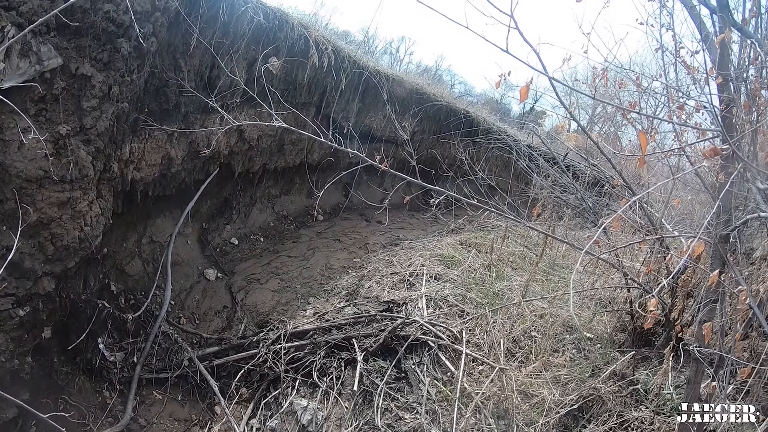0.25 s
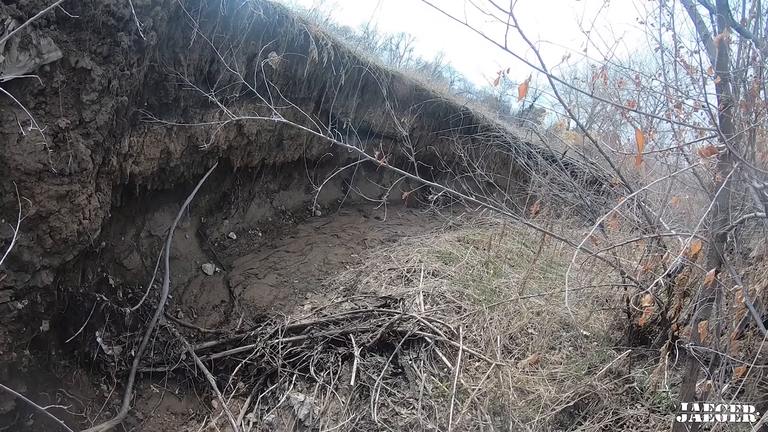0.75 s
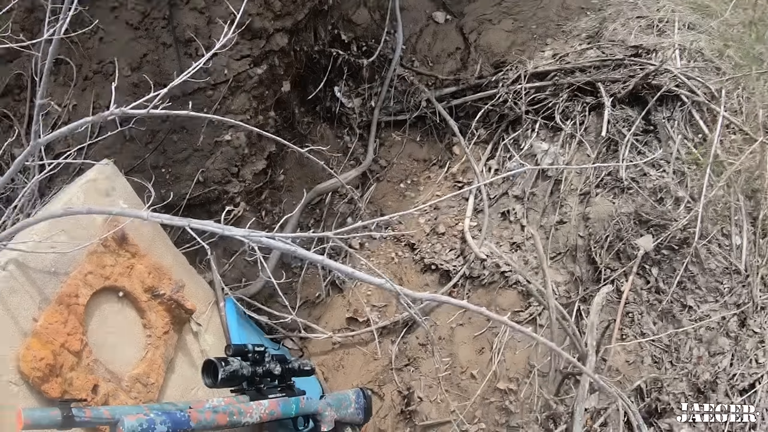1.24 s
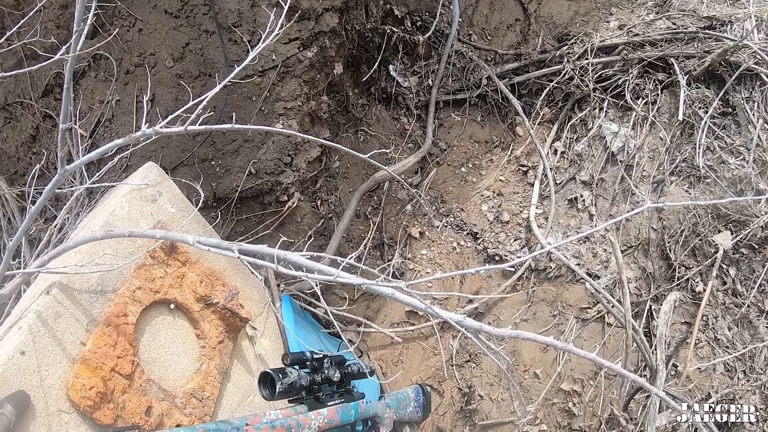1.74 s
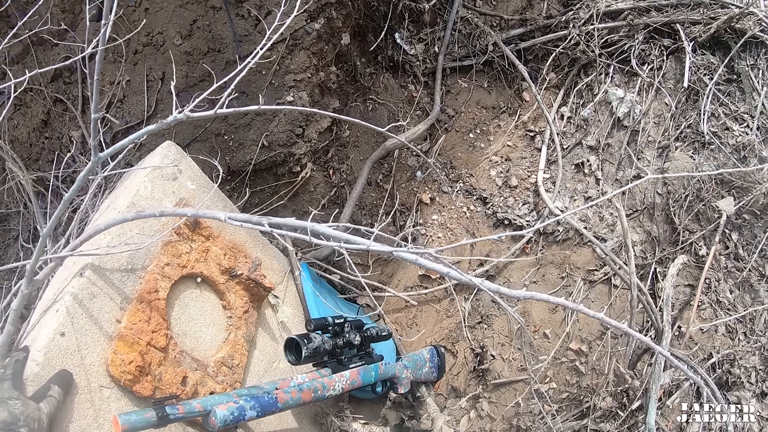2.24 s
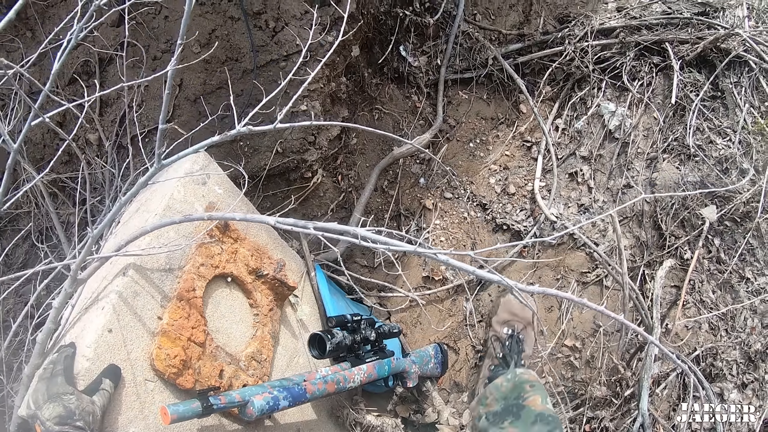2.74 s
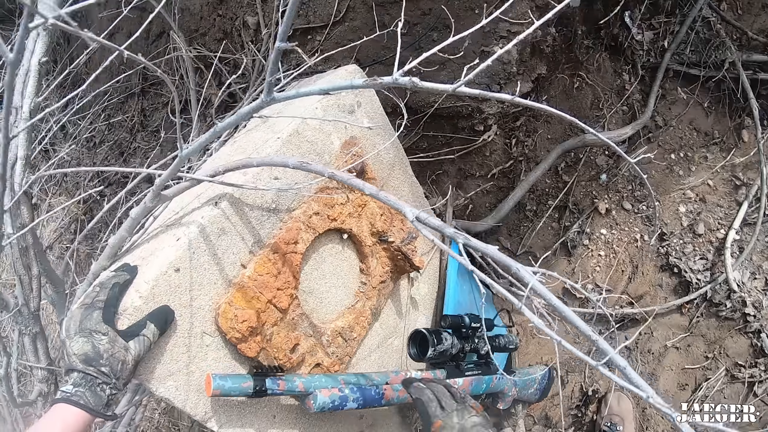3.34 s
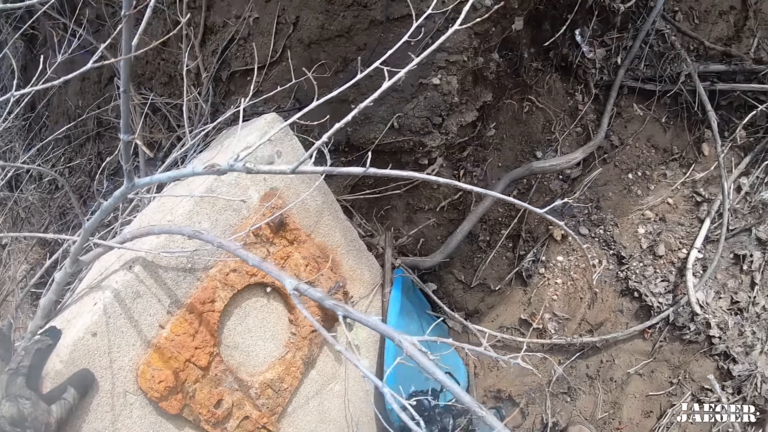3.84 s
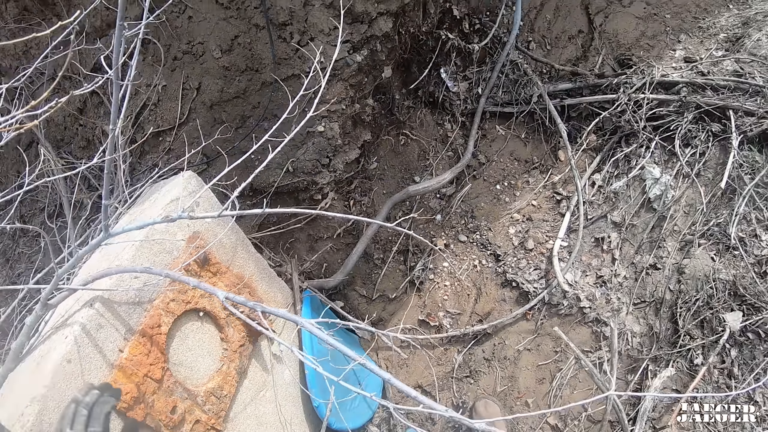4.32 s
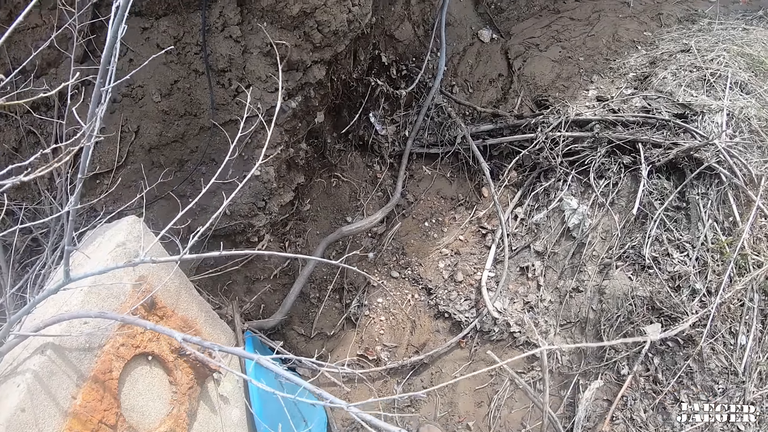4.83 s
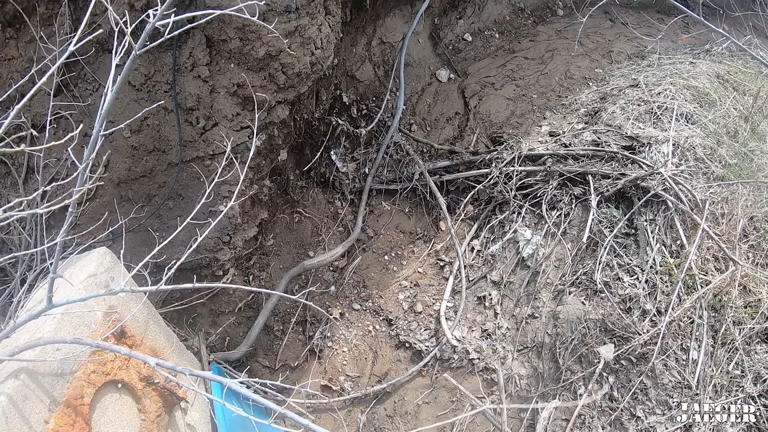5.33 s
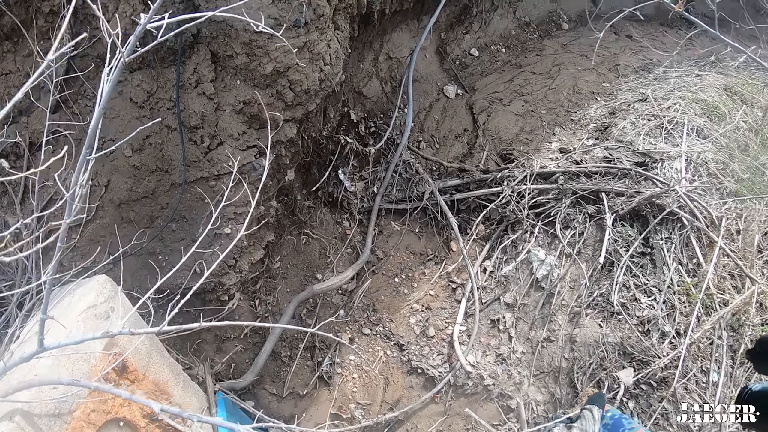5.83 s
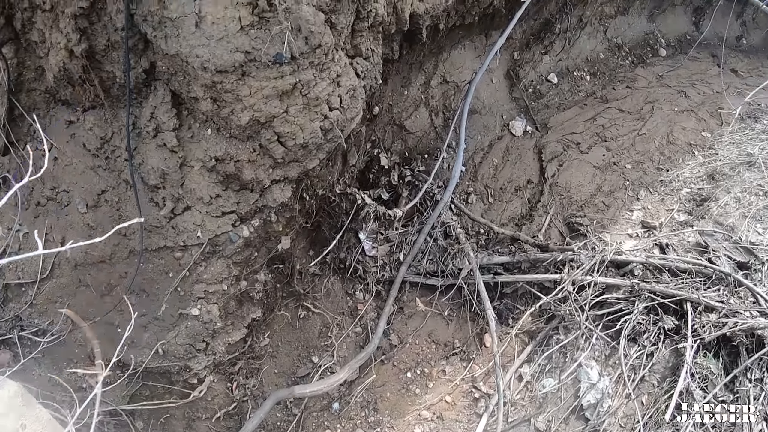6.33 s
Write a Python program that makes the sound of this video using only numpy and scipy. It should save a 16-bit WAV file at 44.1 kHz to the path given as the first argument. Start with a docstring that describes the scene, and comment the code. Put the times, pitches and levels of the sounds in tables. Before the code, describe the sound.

After a brief rustle and a near-quiet pause, dry branches scrape and crackle close up, with one very loud twig snap and muffled bumps on the housing.

```python
"""Dry brush, where someone shifts and steps with a small camera strapped to the body.
Leaves and branches rustle against cloth as trains of random slips; twigs snap and stalks crunch as
dying noise bursts. Rubbing, knocks and taps excite the low resonances of the housing, and the strap
thrums as a sine. Filtered noise gives the wind rumbling on the microphone port and the far leaves."""
import sys
import numpy as np
from scipy import signal
from scipy.fft import rfft, irfft
from scipy.io import wavfile

SR = 44100
rng = np.random.default_rng(int(sys.argv[2]) if len(sys.argv) > 2 else 0)


def log_audio(samples):
    """Write samples as a 16-bit WAV file to the path given in sys.argv[1]."""
    # one column per channel
    frames = np.atleast_2d(samples).T
    # limit to full scale, then quantise
    limited = np.clip(frames, -1, 1)
    pcm = np.round(limited * 32767).astype(np.int16)
    wavfile.write(sys.argv[1], SR, pcm)


N = 289737

# leaves and twigs dragged along, level by grain size: start_s, coarse_db, middle_db, fine_db
DRAG_LEVELS = [(0.0, -50.5, -54, -51.5), (0.1, -67.5, -66, -66.5), (0.45, -71.5, -64.5, -67.5),
               (0.56, -78.5, -66.5, -70.5), (0.87, -83, -79.5, -91), (1.5, -85, -83, -99),
               (1.63, -60, -57.5, -62), (1.75, -58.5, -56.5, -60.5), (2.0, -58.5, -66, -61.5),
               (2.17, -58, -53, -53), (2.27, -49, -48.5, -48), (2.4, -55, -53, -52),
               (2.49, -58, -61.5, -54), (2.68, -71, -65, -62.5), (2.8, -53.5, -64, -63),
               (2.93, -61, -62.5, -62.5), (3.07, -68, -63, -66), (3.18, -62, -59.5, -62),
               (3.28, -68, -63, -61.5), (3.36, -60.5, -57.5, -56), (3.6, -58.5, -57, -58),
               (3.72, -57.5, -54, -51), (3.9, -60, -59, -62), (4.23, -62, -61, -67.5),
               (4.495, -65, -63, -64), (4.508, -55, -54, -57), (4.528, -59, -56.5, -57),
               (4.545, -54, -52, -49.5), (4.72, -55, -51, -49.5), (4.88, -63.5, -60.5, -59.5),
               (5.15, -64, -62, -59.5), (5.25, -62, -63, -65), (5.45, -59, -57, -57),
               (5.63, -63.5, -64, -61.5), (5.76, -67, -66, -60), (5.88, -67, -61.5, -57.5),
               (6.1, -72, -64, -60), (6.3, -76, -63, -56.5), (6.57, -61, -59, -51)]
# airborne sound behind the small port: frequency_hz, density_db (per Hz)
PORT_FACING = [(590, -15.5), (1000, -15.5), (1360, -17.5), (1580, -15), (2140, -10.5), (2510, -1.5),
               (3050, -6.5), (3550, -7.5), (4200, -10), (5550, 2.5), (6250, -2), (6750, 0), (7320, -1.5),
               (8050, -1), (8750, -8.5), (9250, -14.5), (9800, -24), (10500, -19), (13000, -22.5),
               (15600, -21)]
# the same once the wearer has turned: frequency_hz, density_db (per Hz)
PORT_AWAY = [(590, -59), (1000, -20), (1130, -9), (1380, -21), (2090, -10.5), (2820, -4.5), (3200, -9),
             (4310, -3.5), (5300, 6), (6450, 7), (9100, -16.5), (12000, -23), (15600, -33)]
# how far the wearer has turned: start_s, share_turned (0-1)
TURNING = [(0, 0), (4.45, 0.04), (4.62, 0.24), (4.9, 0.1), (5.3, 0.66), (6.57, 0.74)]
# sharp part of a knock or tap: frequency_hz, density_db (per Hz)
RAP_SPECTRUM = [(200, 5), (600, -12.5), (850, -1.5), (1200, -18), (2000, -29.5)]


def from_db(db):
    """Amplitude ratio: 20 dB is a factor of ten."""
    return 10 ** (np.asarray(db) / 20)


def rms_one(x):
    """Normalisation to unit root-mean-square."""
    return x / np.sqrt(np.mean(x ** 2) + 1e-20)


def in_time(rows):
    """Linear interpolation of each curve column at every sample."""
    s, *columns = np.transpose(rows)
    return [np.interp(np.arange(N) / SR, s, c) for c in columns]


def drift(corner_hz):
    """Slow random modulation: noise through two equal one-pole low-passes; rms 1."""
    step = 20   # samples between drawn values
    r = np.exp(-2 * np.pi * step * corner_hz / SR)
    noise = rng.standard_normal(N // step + 2002)
    slow = signal.lfilter([1], [1, -2 * r, r * r], noise)[2000:]   # the run-in is dropped
    return np.interp(np.arange(N) / step, np.arange(len(slow)), rms_one(slow))


def colour(x, spectrum, size=8192):
    """Causality: a minimum-phase filter with this spectrum, so nothing sounds before its cause."""
    hz, db = np.transpose(spectrum)
    grid = np.log(np.maximum(np.fft.rfftfreq(size, 1 / SR), 1))
    cepstrum = irfft(np.log(from_db(np.interp(grid, np.log(hz), db))))
    # folding the cepstrum onto positive times makes the phase minimal
    cepstrum[1:size // 2] *= 2
    cepstrum[size // 2 + 1:] = 0
    return signal.fftconvolve(x, irfft(np.exp(rfft(cepstrum))))[:len(x)]


def resonance(x, hz, width_hz):
    """Damped oscillator: a two-pole band-pass with gain 1 on top."""
    r = np.exp(-np.pi * width_hz / SR)
    poles = [1, -2 * r * np.cos(2 * np.pi * hz / SR), r * r]
    return signal.lfilter([(1 - r * r) / 2, 0, (r * r - 1) / 2], poles, x)


def steep(x, hz, width_hz):
    """Two equal resonances in cascade, for steeper skirts; the width is that of each."""
    return resonance(resonance(x, hz, width_hz), hz, width_hz)


def grains(per_s, spread_db, clump_db, clump_hz):
    """Stick-slip as a random pulse train: slips of uneven size that come in clumps; rms 1."""
    sizes = from_db(spread_db * np.minimum(rng.exponential(1, N), 5))
    signs = rng.choice([-1, 1], N)
    slipping = rng.random(N) < per_s / SR
    return rms_one(sizes * signs * slipping * from_db(clump_db * drift(clump_hz)))


def stroke(s, hold_s, attack_s, release_s):
    """Envelope of friction: samples covered and power shape as a stroke rises, holds and dies."""
    span = slice(round(s * SR), min(round((s + hold_s) * SR) + SR // 3, N))
    since = np.arange(span.stop - span.start) / SR
    # time to fall 30 dB; longer strokes die more slowly
    fall_s = release_s + hold_s
    falling = np.maximum(since - attack_s - hold_s, 0) / fall_s
    return span, (np.clip(since / attack_s, 0, 1) * from_db(-30 * falling)) ** 2


def bursts(events, t60_s, longer, rise_s, width_share, top_hz, tail_db, tail_times,
           spectrum, turned_spectrum, break_db=13.5):
    """Impulsive excitation: a click in dying noise rings round a pitch, plus a broad crack.

    t60_s holds at a peak of -35 dB; longer is dB of ring time per dB of peak above that.
    break_db sets the click against the noise; the weaker tail lasts tail_times as long.
    """
    out, t = np.zeros(N + SR), np.arange(SR // 5) / SR
    dull = signal.butter(2, min(top_hz, 20000), fs=SR)
    turned = in_time(TURNING)[0]
    noises = rng.standard_normal((len(events), len(t)))
    for (s, peak_db, hz, broad_db), noise in zip(events, noises):
        at = round(s * SR)
        t60 = t60_s * from_db(longer * (peak_db + 35.0))
        dying = from_db(-60 * t / t60) + from_db(tail_db - 60 * t / (tail_times * t60))
        burst = noise * dying * (1 - np.exp(-(t / rise_s) ** 2))
        burst[round(rise_s * SR)] += from_db(break_db)
        crack = colour(burst, turned_spectrum if turned[at] > .5 else spectrum, size=2048)
        ring = steep(burst, hz, width_share * hz)
        burst = signal.lfilter(*dull, ring + from_db(broad_db) * crack)
        out[at:at + len(t)] += from_db(peak_db) * burst / np.abs(burst).max()
    return out[:N]


def brushing():
    """Addition of powers: levels in dB of coarse to finest grains from the drag plus swishes."""
    # the finest grains of the drag: start_s, level_db
    finest_drag = [(0.0, -59), (0.07, -69), (0.68, -99), (1.52, -106), (1.66, -69), (1.83, -68),
                   (2.12, -61), (2.38, -59), (2.49, -58), (2.63, -63.5), (3.04, -70.5), (3.22, -65.5),
                   (3.53, -60.5), (3.71, -57), (4.04, -72.5), (4.35, -74.5), (4.495, -70), (4.51, -59),
                   (4.66, -53.5), (5.05, -72), (5.18, -73), (5.42, -72), (5.6, -66), (6.29, -61.5),
                   (6.4, -57), (6.57, -54.5)]
    # short swishes of a branch over cloth: start_s, hold_s, coarse_and_middle_db, fine_db
    swish_strokes = [(0.0, 0.01, -82.5, -68), (0.233, 0.014, -64, -74), (0.445, 0.041, -62.5, -69),
                     (0.687, 0.021, -85, -72), (1.696, 0.03, -53.5, -61), (2.855, 0.014, -54.5, -55),
                     (2.945, 0.0045, -51, -56), (3.604, 0.016, -59, -64), (3.83, 0.054, -75, -58.5),
                     (4.366, 0.076, -71, -64), (5.045, 0.024, -62, -54.5), (5.104, 0.01, -75, -58),
                     (5.173, 0.0092, -57, -74), (5.419, 0.018, -69, -52.5), (5.811, 0.007, -61, -52.5),
                     (5.972, 0.057, -66, -56), (6.225, 0.012, -67, -60), (6.248, 0.023, -66, -55),
                     (6.488, 0.0098, -54, -73)]
    coarse_db, finest_db = -2.5, -3.5   # coarse against middle grains, finest against fine, in a swish
    power = from_db(in_time(DRAG_LEVELS) + in_time(finest_drag)) ** 2
    for s, hold_s, dull_db, fine_db in swish_strokes:
        span, shape = stroke(s, hold_s, attack_s=0.014, release_s=0.018)
        levels_db = [[dull_db + coarse_db], [dull_db], [fine_db], [fine_db + finest_db]]
        power[:, span] += from_db(levels_db) ** 2 * shape
    return 10 * np.log10(power)


def rustle():
    """Granular friction: thousands of leaf and bark slips a second, each ringing briefly at a pitch."""
    # limits of the coarse, middle, fine and finest bands: edge_hz
    band_edges = [500, 2000, 4000, 7300, 18000]
    slips = grains(9000, 0.27, 0.22, 58)
    clumps = from_db(1.43 * drift(36.8))
    slips = slips + from_db(-11.0) * grains(500, 2.8, 2.7, 8)   # sparse bigger ticks among them
    pitches = np.geomspace(900, 15000, 24)
    dealt = rng.integers(0, len(pitches), N)   # which pitch each slip rings at
    rings = 0
    for k, hz in enumerate(pitches):
        own_slips = slips * (dealt == k) * from_db(0.5 * drift(16.0))
        rings = rings + resonance(own_slips, hz, 0.28 * hz) / np.sqrt(hz)
    heard = np.array([colour(rings, PORT_FACING), colour(rings, PORT_AWAY)])
    turned = in_time(TURNING)[0]
    out = 0
    for level_db, low, high in zip(brushing(), band_edges, band_edges[1:]):
        band = signal.butter(3, [low, high], "band", fs=SR, output="sos")
        facing, away = signal.sosfilt(band, heard)
        out = out + from_db(level_db) * ((1 - turned) * rms_one(facing) + turned * rms_one(away))
    return clumps * out


def scrapes():
    """Resonant friction: uneven slips of bark on cloth ring round one pitch for a stroke."""
    # single branches scraping: start_s, hold_s, level_db, pitch_hz, width_hz
    scrape_strokes = [(1.617, 0.076, -56, 1090, 397), (1.687, 0.08, -51.5, 1090, 394),
                      (1.626, 0.065, -63.5, 3470, 700), (1.68, 0.34, -60.5, 2230, 900),
                      (2.18, 0.15, -51.5, 5300, 706), (2.235, 0.096, -60.5, 8160, 900),
                      (2.705, 0.16, -61, 1620, 695), (2.956, 0.13, -66.5, 1480, 696),
                      (3.632, 0.1, -56.5, 2430, 800), (3.635, 0.058, -57, 3930, 1000),
                      (4.528, 0.29, -70, 2590, 1210), (5.278, 0.2, -65, 2280, 600),
                      (5.49, 0.094, -67, 2230, 700), (5.623, 0.039, -74, 1730, 400),
                      (5.867, 0.26, -67, 1630, 450), (5.89, 0.14, -74, 2380, 400),
                      (1.87, 0.18, -62.5, 1570, 900), (2.754, 0.11, -62.5, 2320, 900)]
    out, slips = np.zeros(N), grains(4000, 0.8, 1.25, 40)
    for s, hold_s, db, hz, width_hz in scrape_strokes:
        span, shape = stroke(s, hold_s, attack_s=0.02, release_s=0.055)
        out[span] += from_db(db) * np.sqrt(shape) * rms_one(steep(slips[span], hz, width_hz))
    return out


def snaps():
    """Brittle fracture: a twig gives a click and a short ring, about as long for weak and strong breaks."""
    # twigs breaking: start_s, peak_db, pitch_hz, broad_crack_db
    twig_breaks = [(0.0586, -28, 4870, 16), (0.059, -33, 8500, -5), (0.0595, -48, 13000, -20),
                   (0.1095, -47, 5050, -21), (0.1575, -43, 5100, 11), (0.221, -50, 8300, 4),
                   (0.255, -57, 8300, 0), (0.262, -46, 2640, -7), (0.3945, -45.5, 2120, -6),
                   (0.4349, -46, 5070, -12), (0.4732, -50, 2470, -28), (1.2342, -52.5, 2400, -8),
                   (1.666, -48, 6500, -1), (1.7265, -37, 2500, -5), (1.7275, -41, 3580, -12),
                   (1.797, -42.5, 2200, -12), (1.815, -41, 5560, 12), (1.844, -41, 8200, 3),
                   (1.912, -47, 8100, -5), (2.042, -44, 6200, -5), (2.0867, -39.5, 2630, -10),
                   (2.1114, -40, 2600, -1), (2.1355, -48, 5400, -8), (2.232, -7, 5500, 4),
                   (2.2325, -24, 2600, 8), (2.2335, -15.5, 7600, 0), (2.234, -32, 5850, -19),
                   (2.2328, -36, 13100, -20), (2.361, -49, 8000, -10), (2.405, -37, 8300, 7),
                   (2.432, -36, 7100, -19), (2.4507, -46, 7840, -19), (2.483, -31, 5800, -13),
                   (2.5274, -37.5, 6100, 13), (2.5676, -35, 6500, 12), (2.6338, -39.5, 7730, -16),
                   (2.66, -37, 7840, 10), (2.8667, -37.5, 7600, -6), (2.9, -43, 6300, -8),
                   (2.956, -42, 7700, -13), (2.954, -36.5, 2570, -7), (3.472, -40, 3900, -1),
                   (3.5035, -30, 3930, -9), (3.504, -30.5, 5500, -3), (3.5254, -40, 5300, 0),
                   (3.5882, -31.5, 2520, 2), (3.6165, -45, 3800, -5), (3.7572, -42, 2450, -31),
                   (3.7993, -41, 2460, -13), (3.874, -40, 1860, -9), (3.8745, -47, 3630, -12),
                   (4.07, -44.5, 3450, -14.5), (4.29, -49, 7900, -10), (4.649, -25, 5200, 7),
                   (4.805, -39.5, 2330, -14), (4.9696, -39.5, 4730, 1), (5.0656, -40.5, 2430, -15),
                   (5.087, -40, 3500, -2), (5.1, -47, 6300, 0), (5.125, -43, 6550, -1),
                   (5.137, -42, 6300, -4), (5.1433, -41, 3180, -16), (5.1814, -36, 6700, 3),
                   (5.186, -40, 2600, -26), (5.19, -46, 1700, -20), (5.243, -53, 3100, -16),
                   (5.192, -45, 2500, -15), (5.199, -49, 5800, -5), (5.4313, -53, 2290, -13),
                   (5.448, -52, 2280, 2), (5.2, -40, 3150, -10), (5.183, -40, 3400, -13),
                   (5.054, -46, 3400, -12), (4.6, -40, 3300, -7), (4.703, -41, 2600, -3),
                   (6.439, -37, 6800, 2), (5.4787, -35.5, 5100, 15), (5.603, -18, 6060, 22),
                   (5.6035, -39, 2480, -20), (5.6994, -49, 5550, -23), (5.819, -44, 4470, -1),
                   (5.8395, -46, 6500, -5), (5.841, -42.5, 3470, -22), (5.8425, -37.5, 2880, -18),
                   (5.8445, -41.5, 2340, -26), (5.896, -48, 6500, 0), (5.93, -44, 4500, -5),
                   (6.026, -53, 7000, 0), (6.033, -46, 6000, -6), (6.057, -51, 6500, 0),
                   (6.149, -48, 6500, 0), (6.373, -44, 5500, -3), (5.945, -43, 7360, -10),
                   (5.98, -44, 6300, 0), (6.0, -45, 6000, 0), (6.0174, -46, 6140, 3),
                   (6.0926, -42.5, 7000, -14), (6.29, -40, 7000, -5), (6.3245, -20.5, 6100, 5),
                   (6.325, -40, 2740, -19), (6.3583, -38, 3300, -7), (6.5003, -30, 6800, -10),
                   (6.539, -37, 6240, 7)]
    return bursts(twig_breaks, t60_s=0.017, longer=0.012, rise_s=0.0009, width_share=0.17,
                  top_hz=12000, tail_db=-15.0, tail_times=5.1,
                  spectrum=PORT_FACING, turned_spectrum=PORT_AWAY)


def crunches():
    """Progressive crushing: brittle stalks give way over milliseconds, with only a weak click."""
    # stalks crushed: start_s, peak_db, pitch_hz, broad_crack_db
    stalks = [(2.232, -25, 7750, -5), (2.353, -37.5, 6100, -7), (2.48, -35.5, 5660, -9),
              (2.481, -40, 2520, -17), (3.42, -47, 5430, 0), (3.47, -54, 8000, -12), (3.523, -37, 8200, 3),
              (3.586, -38, 5160, 12), (3.699, -39, 5200, -10), (4.436, -49, 3600, -12),
              (4.502, -45, 3400, -1), (4.538, -38, 3140, -4), (4.548, -43, 6500, 7),
              (4.646, -29.5, 5400, 3), (4.679, -43, 5700, 0), (4.802, -45, 4500, 1), (4.943, -47, 6000, 3),
              (5.053, -40, 3400, -8), (5.064, -40, 3880, -14), (5.18, -42, 3400, -9),
              (5.198, -43, 3100, -9), (5.477, -39, 3200, -4), (6.212, -39.5, 6400, -6),
              (6.267, -38.5, 6600, -6), (6.402, -38, 4400, -6), (6.435, -33.5, 6700, -7)]
    return bursts(stalks, t60_s=0.022, longer=0, rise_s=0.0014, width_share=0.25,
                  top_hz=13400, tail_db=-19.0, tail_times=4.7,
                  spectrum=PORT_FACING, turned_spectrum=PORT_AWAY, break_db=-13.0)


def knocks():
    """Impact on a damped body: knocks on the mount ring low, longer when harder."""
    # start_s, peak_db, pitch_hz, broad_crack_db
    mount_knocks = [(0.162, -49, 173, -6), (1.606, -34, 404, -31), (1.691, -31, 104, -25),
                    (2.187, -25, 261, -23.5), (2.231, -20.5, 293, -18.5), (2.236, -27, 150, -23),
                    (2.286, -24.5, 283, -22), (3.531, -38, 190, -23), (3.587, -36, 162, -20),
                    (3.663, -34.5, 150, -19), (4.448, -41, 192, -36), (4.595, -31, 139, 9),
                    (5.449, -49, 420, -5), (5.86, -44, 440, -30), (5.608, -38, 161, -1),
                    (6.007, -36.5, 324, -39), (6.067, -40, 480, -37), (6.202, -38, 221, -39),
                    (6.21, -38.5, 98, -34), (6.25, -44, 89, -24), (6.33, -34, 97.5, -19),
                    (6.242, -50, 195, -18), (6.325, -36, 315, -20), (6.403, -37, 154, -7)]
    return bursts(mount_knocks, t60_s=0.034, longer=0.34, rise_s=0.00276, width_share=0.3,
                  top_hz=1800, tail_db=-16, tail_times=18.0,
                  spectrum=RAP_SPECTRUM, turned_spectrum=RAP_SPECTRUM)


def taps():
    """Light impact: short dry taps on the case, with almost no tail."""
    # start_s, peak_db, pitch_hz, broad_crack_db
    case_taps = [(0.162, -42.5, 830, -19), (1.608, -30.5, 675, -19), (1.627, -25.5, 455, 0),
                 (1.648, -38, 594, -10), (1.674, -33.5, 307, -27), (1.695, -29, 224, -32),
                 (1.706, -28, 300, -20), (1.717, -32, 450, -2), (1.727, -27.5, 430, -14),
                 (1.743, -30, 404, -5), (1.793, -27.5, 405, -10.5), (3.588, -37.5, 720, -25),
                 (3.886, -32, 760, -17), (3.423, -40, 800, -20), (3.666, -33.5, 410, -16),
                 (3.758, -42, 503, -10), (4.649, -34, 880, -20), (4.705, -39.5, 800, -12),
                 (5.056, -42, 870, -18), (5.067, -53, 900, -13), (5.154, -36.5, 228, -19),
                 (5.19, -39, 840, -14), (5.201, -38, 800, -28), (5.448, -32, 500, -18),
                 (5.479, -46, 790, -13), (5.843, -38, 685, -23), (5.935, -43.5, 453, -27),
                 (6.07, -41, 500, -26), (6.215, -48, 500, -10), (6.243, -39, 710, -17),
                 (4.448, -42.5, 790, -15), (5.86, -27.5, 453, -37), (5.868, -29, 362, -40),
                 (6.007, -34, 455, -37), (6.203, -42, 497, -20)]
    return bursts(case_taps, t60_s=0.023, longer=0, rise_s=0.00089, width_share=0.35,
                  top_hz=2100, tail_db=-40.0, tail_times=1.5,
                  spectrum=RAP_SPECTRUM, turned_spectrum=RAP_SPECTRUM)


def strap():
    """Vibrating string: a taut strap thrums for a few cycles as a pure tone."""
    # start_s, hold_s, level_db, pitch_hz
    strap_thrums = [(0.8, 0.06, -60, 178.5), (0.96, 0.062, -51, 188), (1.13, 0.05, -52.5, 161),
                    (1.25, 0.095, -51.5, 191), (3.475, 0.036, -43, 188), (3.889, 0.022, -35.5, 198),
                    (5.108, 0.021, -46.5, 191)]
    out = np.zeros(N)
    for (s, hold_s, db, hz), phase in zip(strap_thrums, rng.random(len(strap_thrums))):
        span, shape = stroke(s, hold_s, attack_s=0.0078, release_s=0.029)
        cycles = hz * np.arange(len(shape)) / SR + phase
        out[span] += from_db(db) * np.sqrt(2 * shape) * np.sin(2 * np.pi * cycles)
    return out


def rubbing():
    """Dry friction on the mount: gains of boom, scuff and hollow ring, and the scuff's pitch in Hz."""
    # strokes: start_s, hold_s, boom_db, scuff_db, scuff_pitch_hz, hollow_db
    rub_strokes = [(0.0, 0.0046, -37.5, -64, 284, -50), (0.096, 0.017, -45, -69, 280, -79),
                   (0.157, 0.0053, -66, -70, 270, -68), (0.72, 0.14, -55, -76, 270, -82),
                   (1.524, 0.091, -68, -55, 303, -84), (1.584, 0.087, -43, -43, 383, -60),
                   (1.691, 0.064, -48, -32, 340, -48), (1.798, 0.072, -54, -40, 320, -51.5),
                   (1.955, 0.061, -72, -68, 305, -56.5), (2.169, 0.11, -41, -37.5, 273, -46.5),
                   (2.279, 0.11, -41.5, -58, 292, -40), (2.335, 0.096, -58, -37.5, 245, -57),
                   (2.616, 0.08, -52, -45.5, 263, -84), (2.728, 0.15, -49.5, -58, 300, -51),
                   (2.945, 0.15, -48, -52, 292, -56), (3.07, 0.051, -49, -45, 295, -71),
                   (3.177, 0.027, -59, -40.5, 364, -58), (3.379, 0.14, -45.5, -71, 280, -56.5),
                   (3.618, 0.16, -77, -44.5, 295, -56.5), (3.877, 0.088, -45, -44, 305, -59),
                   (4.039, 0.076, -49, -43, 303, -58), (4.154, 0.14, -48, -48, 315, -61),
                   (4.535, 0.14, -54, -58, 315, -56), (4.707, 0.086, -50.5, -63, 290, -57),
                   (5.032, 0.028, -56, -50, 292, -53.5), (5.17, 0.029, -67, -45, 328, -50),
                   (5.29, 0.11, -70, -64, 320, -56.5), (5.443, 0.04, -66, -41.5, 346, -54.5),
                   (5.496, 0.12, -51, -43.5, 322, -56.5), (5.85, 0.015, -36.5, -30.5, 427, -60),
                   (5.997, 0.011, -62, -42, 352, -65), (6.048, 0.033, -74, -47, 423, -75),
                   (6.192, 0.036, -40, -31.5, 292, -70), (6.241, 0.029, -32.5, -46, 283, -63),
                   (6.293, 0.043, -47, -35.5, 350, -59), (6.396, 0.016, -60, -46, 312, -52),
                   (6.434, 0.019, -45.5, -37, 300, -62)]
    # cloth always drags a little, more as the brush is pushed harder:
    # (dB at mean push, share of the push followed) for boom, scuff and hollow ring
    steady_drag, drag_hz = ((-52.5, 0.02), (-54, 0.7), (-62.5, 0.35)), 312
    push_db = in_time(DRAG_LEVELS)[0]
    extra_db = push_db - push_db.mean()
    power = np.array([from_db(db + share * extra_db) ** 2 for db, share in steady_drag])
    pitch = power[1] * drag_hz   # weighted by scuff power
    for s, hold_s, boom_db, scuff_db, hz, hollow_db in rub_strokes:
        span, shape = stroke(s, hold_s, attack_s=0.0061, release_s=0.035)
        rub = from_db([[boom_db], [scuff_db], [hollow_db]]) ** 2 * shape
        power[:, span] += rub
        pitch[span] += rub[1] * hz
    return (*np.sqrt(power), pitch / power[1])


def housing():
    """Modal response: rubbing drives the low modes of the case; knocks, taps and thrums join it."""
    # modes of each kind of rubbing: frequency_hz, width_hz, level_db
    boom_modes = [(183.1, 70, 1.5), (150, 59, 3), (98, 70, -7)]
    scuff_modes = [(268.5, 15, -8), (315, 127, -2), (390.3, 136, -6), (451.7, 145, -3.5), (513, 160, -18)]
    hollow_modes = [(802, 270, 24.7), (1036, 1020, 7.1)]
    boom, scuff, hollow, scuff_hz = rubbing()
    out = knocks() + strap() + taps()
    for gain, modes in ((boom, boom_modes), (hollow, hollow_modes)):
        slips = grains(1500, 0.55, 0.7, 36)
        ringing = sum(from_db(db) * steep(slips, hz, width) for hz, width, db in modes)
        out += gain * rms_one(ringing)
    # the scuff favours the modes nearest its pitch
    near = np.array([np.exp(-(np.log(scuff_hz / hz) / 0.45) ** 2) for hz, _, _ in scuff_modes])
    slips = grains(1500, 0.77, 2.35, 45)
    rings = np.array([from_db(db) * rms_one(steep(slips, hz, width)) for hz, width, db in scuff_modes])
    out += scuff * np.sum(near * rings, axis=0) / np.sqrt(np.sum(near ** 2, axis=0))
    out -= 0.49 * resonance(out, hz=562, width_hz=128)   # a node of the case
    return signal.sosfilt(signal.butter(2, 1600, fs=SR, output="sos"), out)


def wind():
    """Turbulent pressure: slow lumps of low-frequency noise on the port."""
    # wind level on the port: start_s, level_db
    wind_levels = [(0.0, -52), (0.16, -54), (0.44, -39.5), (0.48, -49), (0.68, -44), (0.71, -35),
                   (0.79, -46.5), (1.21, -40.5), (1.34, -54.5), (1.52, -45), (1.53, -59), (1.61, -38.5),
                   (1.66, -46), (1.7, -36), (2.01, -58), (2.21, -51), (2.25, -47), (2.38, -55), (3.13, -41),
                   (3.22, -55), (4.12, -46.5), (4.19, -61), (4.26, -52), (4.28, -59), (4.61, -39),
                   (4.68, -44), (4.87, -49.5), (4.94, -58), (5.32, -40), (5.36, -37), (6.13, -48.5),
                   (6.24, -38), (6.55, -36.5), (6.57, -45)]
    # wind spectrum: frequency_hz, density_db (per Hz)
    gust_spectrum = [(12, -51.5), (21, -13), (33, -11), (45, -16), (86, -26), (113, -30.5), (130, -37.5),
                     (170, -49), (290, -120)]
    lumps = rng.standard_normal(N) * from_db(3.4 * drift(35))
    return from_db(in_time(wind_levels)[0]) * rms_one(colour(lumps, gust_spectrum, size=32768))


def far_leaves():
    """Superposition of many far sources: distant leaves blur into a steady coloured noise."""
    # frequency_hz, density_db (per Hz)
    leaf_spectrum = [(590, -42), (1000, -25), (1890, -6), (3980, 1.5), (4310, -2.5), (10600, -16),
                     (12400, -24), (15000, -46)]
    return from_db(-75.5) * rms_one(colour(rng.standard_normal(N), leaf_spectrum))


def scene():
    """Superposition at one microphone, with the port's side cavity as an absorbing notch."""
    air = rustle() + scrapes() + snaps() + crunches()
    # the notch of the side cavity fades as the wearer turns
    cavity = resonance(air, hz=7360, width_hz=900)
    air -= 0.89 * (1 - in_time(TURNING)[0]) * cavity
    mono = air + housing() + wind() + far_leaves()
    return np.array([mono, mono])


def record(dry):
    """Interchannel difference: channels part faintly; right top treble is late and louder; top cut."""
    high = signal.butter(6, 11500, "high", fs=SR, output="sos")
    top = signal.sosfiltfilt(high, dry[1])
    treble = signal.sosfilt(signal.butter(3, 1300, "high", fs=SR, output="sos"), dry[0])
    # a randomly wavering share of the treble, opposite in sign on the two sides
    waver = from_db(-36.5 + 2.9 * drift(7.1)) * drift(600) * treble
    late_top = from_db(3.0) * np.roll(top, 1)   # one sample late
    parted = np.array([dry[0] + waver, dry[1] - waver - top + late_top])
    return signal.sosfilt(signal.ellip(10, .5, 70, 15700, fs=SR, output="sos"), parted)


dry = scene()
out = record(dry)
log_audio(out)
```